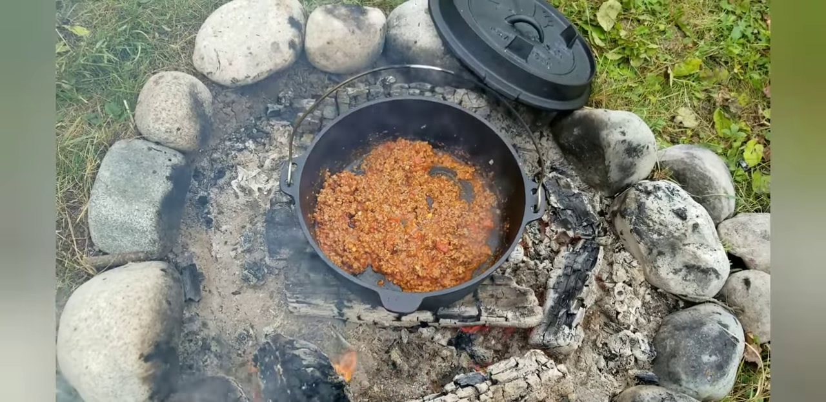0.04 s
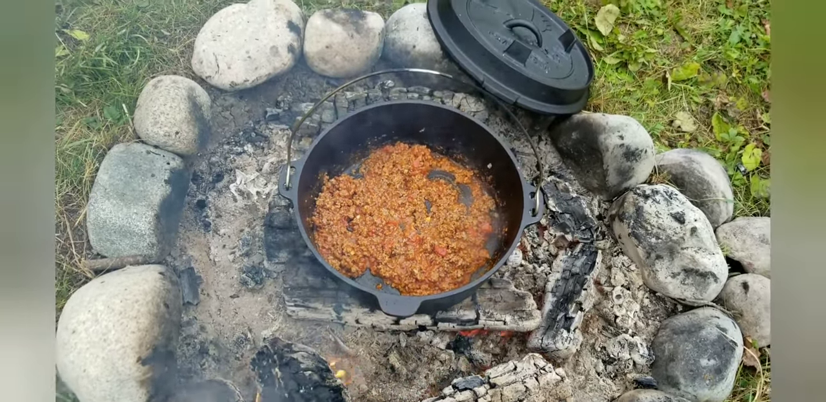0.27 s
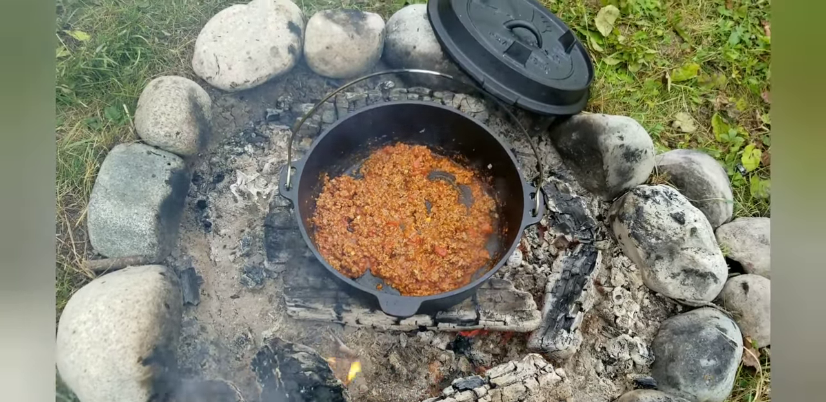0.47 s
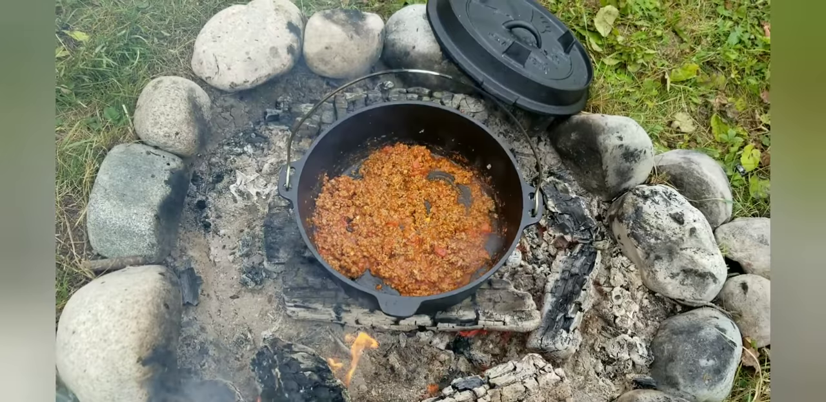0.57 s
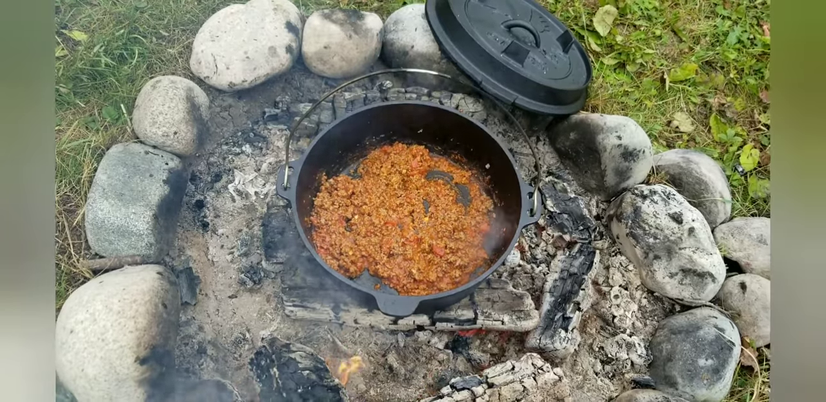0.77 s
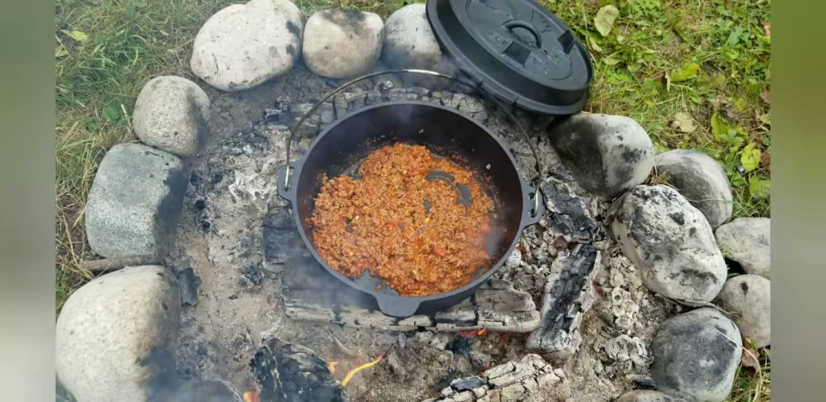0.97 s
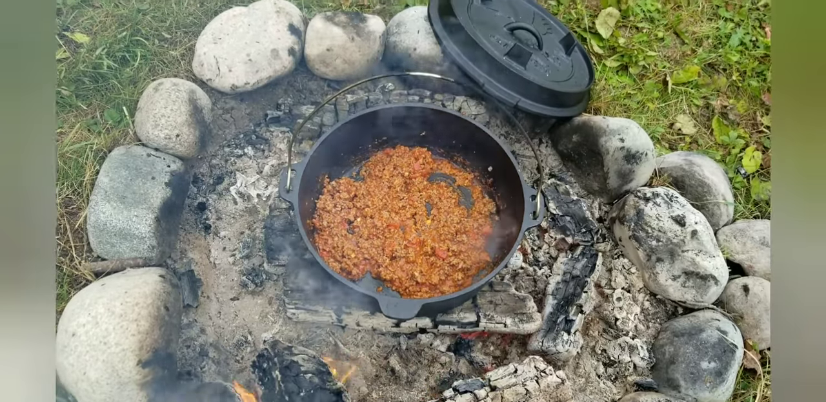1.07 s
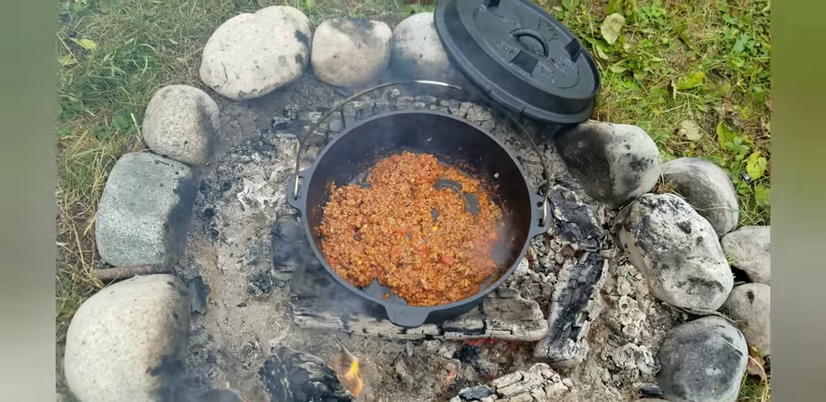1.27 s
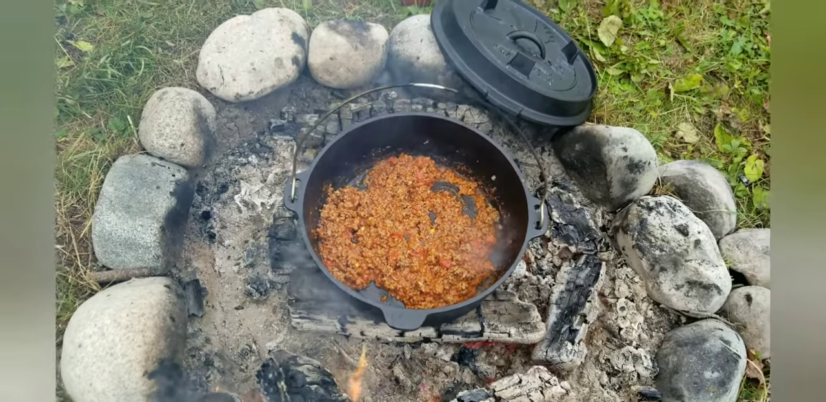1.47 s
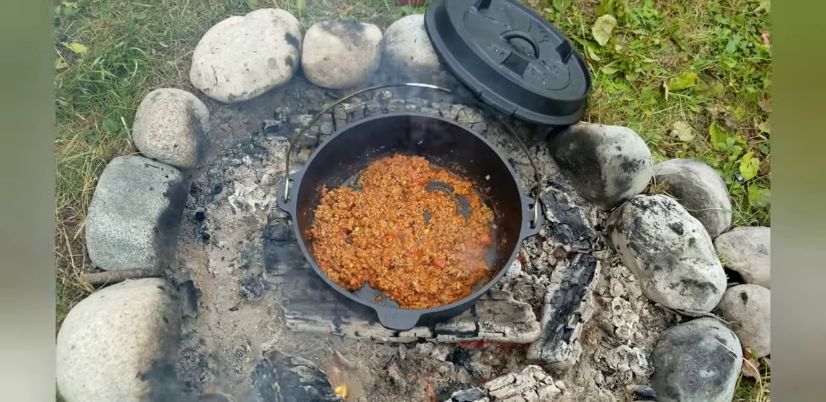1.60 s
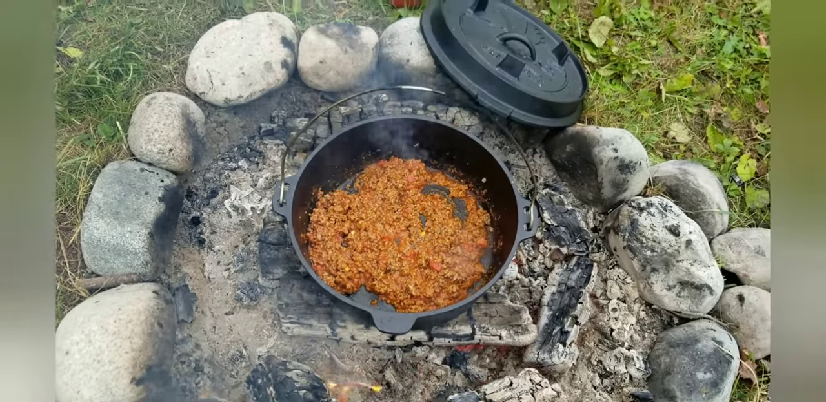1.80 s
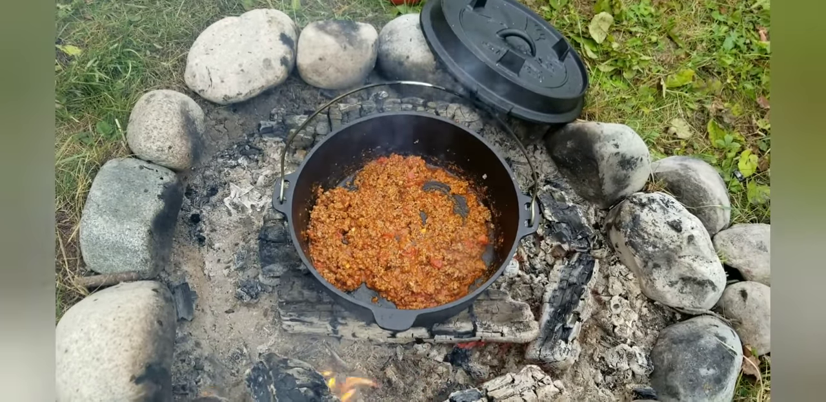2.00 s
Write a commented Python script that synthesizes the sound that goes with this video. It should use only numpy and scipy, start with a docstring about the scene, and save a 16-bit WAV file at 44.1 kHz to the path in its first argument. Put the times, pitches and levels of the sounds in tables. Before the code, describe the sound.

Meat sauce sizzling and simmering in an iron pot over a wood fire, two sharp pops

```python
"""Meat sauce simmers in a cast iron pot over an outdoor wood fire: dense random clicks over a noise wash.
Larger bubbles add short, slightly rising notes; steam is filtered noise, mostly right, that swells and sinks.
Flames are low noise with short flares; embers tick and crackle in short decaying bursts.
Twice the wood pops: a crack, spitting gas, ringing log modes and a low knock."""
import sys
import numpy as np
from scipy import signal
from scipy.fft import rfft, irfft
from scipy.io import wavfile
from scipy.ndimage import uniform_filter1d

SR = 44100
rng = np.random.default_rng(int(sys.argv[2]) if len(sys.argv) > 2 else 0)


def inscribe(sig):
    """Save sig as 16-bit PCM at rate SR to the path in sys.argv[1].

    A 1-D sig is mono; a 2-D sig holds one channel per row.
    Samples are clipped to [-1, 1] before scaling.
    """
    pcm = np.round(np.clip(np.atleast_2d(sig).T, -1, 1) * 32767)
    wavfile.write(sys.argv[1], SR, pcm.astype(np.int16))


N = 90404
TIME_S, FREQ_HZ = np.arange(N) / SR, np.fft.rfftfreq(N, 1 / SR)

# Ember crackle spectrum: f/Hz, density/dB per Hz
CRACKLE_SPECTRUM = [(500, -5), (3000, -5.5), (8000, -7), (15000, -2)]
CRACKLES_PER_S, CRACKLE_DB, CRACKLE_SPREAD_DB, CRACKLE_DECAY_S = 22, -55, 2.5, .0004

# Ember ticks: t/s, level/dB, decay/s, spectrum/dB at 600 Hz, 3 kHz, 7 kHz, 14 kHz,
# left-right/dB, right lag/s
TICKS = [(0.2276, -39.5, 0.0024, -30, 5.5, -6.5, -9, 1, .0004),
         (0.3224, -35, 0.0004, 9, -7, 6.5, -0.5, 5, .0004),
         (0.5315, -43, 0.0016, -2, 1, -6, -12, -1, .0004), (0.6384, -35, 0.00063, -31, -32, -21, 9, -1, 0),
         (0.7099, -33.5, 0.0013, -8, 1.5, -9.5, -7.5, -0.5, 0),
         (1.0940, -47, 0.00046, -6, -21, -9, 11, 6, 0), (1.3750, -41, .001, -3, 3, -3, 1, -2, 0),
         (1.4012, -46, .0006, 2, -17, -13, 5, 7, 0), (1.4623, -47, 0.0035, -16, 5, 5, -7, 7, 0),
         (1.9957, -43.5, 0.001, 5.5, -6.5, -39, -27, 2.5, 0)]
TICK_RISE_S, TICK_TAIL_DB, TICK_TAIL_S = 0.00032, -18, .004
TICK_LIKENESS = 0.23  # left-right, also for crackle
BURST_REF_S = .005  # burst levels: energy spread over this time

# Flame rumble spectrum: f/Hz, density/dB per Hz
FLAME_SPECTRUM = [(15, -34), (30, -27), (60, -3), (110, -12.5), (170, -21), (280, -27), (500, -35.5),
                  (1200, -39)]
# Steady flutter: t/s, level/dB
FLUTTER = [(0, -63), (.2, -58.5), (.65, -58.5), (.84, -62), (.92, -64.5), (1.05, -60), (1.2, -61),
           (1.3, -64), (1.5, -60.5), (1.66, -72), (1.8, -61), (2.05, -56.5)]
# Flares: start/s, length/s, level/dB, upper edge/Hz
FLARES = [(-.02, 0.059, -56, 118), (.05, .08, -57, 224), (.252, 0.029, -49.5, 158), (.275, 0.1, -53.5, 466),
          (.34, 0.11, -57, 143), (.465, 0.13, -55.5, 193), (.53, 0.11, -60.5, 232),
          (.755, 0.083, -51.5, 295), (.795, 0.086, -53, 138), (1.0, 0.05, -56.5, 167),
          (1.35, .1, -62.5, 137), (1.44, 0.14, -62, 104), (1.77, 0.087, -66, 105),
          (1.98, 0.045, -58.5, 138)]
FLARE_LOW_HZ, FLAME_LIKENESS = 42.4, 0.91

# Wood pops: t/s, crack level/dB, crack decay/s, gas level/dB, gas decay/s, tilt/dB per octave,
# left-right/dB, ring level/dB, knock level/dB, knock f/Hz
POPS = [(.461, -27.5, 0.0059, -29.5, 0.021, -2, 0, -48.5, -33.5, 353),
        (0.747, -21.5, 0.0028, -24.5, 0.014, 2, 3, -29, -34.5, 257)]
# Crack spectrum: f/Hz, density/dB per Hz
CRACK_SPECTRUM = [(80, -41), (200, -35), (380, -12.5), (700, -7), (950, -9), (1400, 1.5), (1700, -9.5),
                  (2050, 0), (2600, -7.5), (3200, -3.5), (4000, -4), (5000, -25), (8000, -20.5),
                  (11000, -24), (16000, -40)]
# Escaping gas spectrum: f/Hz, density/dB per Hz
GAS_SPECTRUM = [(80, -16.5), (250, -5.5), (450, -9), (680, -4.5), (900, -3), (1150, -3.5), (1600, -5.5),
                (2100, -11.5), (2500, -13), (2950, -5), (3500, -10.5), (6500, -17), (9000, -31),
                (16000, -37)]
# Log modes: f/Hz, relative level/dB, t60/s
LOG_MODES = [(637, -1, 0.1), (735, -11.5, .08), (1400, 3, 0.097), (2030, -7.5, 0.12), (2025, 6, 0.034),
             (2390, -3, 0.05), (2860, -1, 0.12), (3836, 1, 0.11), (4100, -38, 0.025)]
CRACK_RISE_S, GAS_RISE_S, GAS_HOLD_S = 0.0016, 0.0016, 0.022
POP_RIGHT_LAG_S, POP_LIKENESS = 0.000439, 0.72
GROUND_ECHO_S, GROUND_ECHO_GAIN = 0.00068, 0.15
KNOCK_RISE_S, KNOCK_DECAY_S, KNOCK_SAG = 0.001, 0.0061, 0.1  # sag: fraction of pitch

# Steam hiss spectrum: f/Hz, density/dB per Hz
HISS_SPECTRUM = [(400, -36), (900, -11.5), (1500, -4.5), (2000, -6.5), (2500, -1.5), (3600, -3),
                 (5600, 1.5), (7000, -3), (9300, -8), (12500, 1), (16000, -2)]
# Hiss gain on the left: f/Hz, gain/dB
HISS_LEFT = [(1000, -3.5), (2400, -5), (4200, -3), (5600, -12), (8500, 1), (14000, -7)]
# Steam course: t/s, level/dB, extra treble/dB
STEAM = [(0, -50.5, -3), (.15, -44, -3), (.27, -42, -9), (.34, -44.5, 4), (.43, -40, -1), (.56, -41, -2),
         (.68, -47, -6), (.78, -41, -21), (.87, -58, -14), (.97, -51, -8), (1.08, -47.5, 0),
         (1.27, -43, -3.5), (1.5, -43, -4), (1.78, -42, -1.5), (1.9, -44.5, -4.5), (2.05, -52.5, -8)]
HISS_FLICKER_DB, HISS_FLICKER_HZ, TREBLE_HZ = 1.0, 87, 8100
PATCH_DB = 1.7  # rms of the colour shifts

# Larger bubbles
BLIPS_PER_S, BLIP_DB, BLIP_SPREAD_DB = 160, -60, 2.5
BLIP_LOW_HZ, BLIP_HIGH_HZ = 557.6, 5120
BLIP_CYCLES, BLIP_GLIDE = 9.7, 0.035  # cycles per e-fold decay, fractional rise per e-fold

# Bubble spectrum, coloured by the pot: f/Hz, density/dB per Hz
SIMMER_SPECTRUM = [(250, -12.5), (420, -16.5), (560, 4.5), (660, 1), (830, -6.5), (1020, 3), (1250, -3),
                   (1480, 1.5), (1900, -7), (2800, -5), (4500, -5), (7000, -5.5), (9300, -11.5),
                   (12500, -3.5), (16000, -8.5)]
# Left-right likeness of the simmer: f/Hz, likeness
SIMMER_LIKENESS = [(500, 0.77), (1500, 0.85), (3000, 0.73), (6000, 0.083), (15000, 0.033)]
SIMMER_DB, BUBBLES_PER_S, WASH_SHARE = -53.5, 4000, 0.37  # share of power

EDGE_HZ = 16100


def amp(db):
    """Decibels to gain."""
    return 10 ** (np.asarray(db) / 20)


def evened(x):
    """Scales to an rms of one."""
    return x / np.sqrt(np.mean(x ** 2) + 1e-20)


def read(points, hz):
    """Reads a table on a log-frequency axis."""
    f, value = np.transpose(points)
    return np.interp(np.log(hz + 1), np.log(f + 1), value)


def add(mix, start_s, sound):
    """Mixes a stereo sound in at a time, trimmed to the mix."""
    at = round(start_s * SR)
    sound = sound[:, max(-at, 0):]
    part = mix[:, max(at, 0):][:, :sound.shape[1]]
    part += sound[:, :part.shape[1]]


def colour(x, points, tilt_db_per_octave=0, size=4096):
    """Minimum-phase filter that follows a spectrum, tilted about 2 kHz."""
    hz = np.fft.rfftfreq(size, 1 / SR)
    octaves = np.log2(np.maximum(hz, 200) / 2000)
    log_gain = np.log(amp(read(points, hz) + tilt_db_per_octave * octaves))
    circle = np.r_[log_gain, log_gain[-2:0:-1]]
    response = np.exp(np.conj(signal.hilbert(circle)))
    taps = np.fft.ifft(response).real[:size // 2]
    return signal.fftconvolve(x, taps[None], axes=1)[:, :x.shape[1]]


def pair(x, likeness):
    """Blends two unrelated signals into a left and a right of given likeness."""
    likeness = np.clip(likeness, -1, 1)
    mid = x[0] * np.sqrt((1 + likeness) / 2)
    side = x[1] * np.sqrt((1 - likeness) / 2)
    return np.array([mid + side, mid - side])


def place(x, pan_db, lag_s):
    """Sets the left-right balance and delays the right side."""
    size = x.shape[1]
    delay = np.exp(-2j * np.pi * np.fft.rfftfreq(size, 1 / SR) * lag_s)
    late = irfft(rfft(x[-1]) * delay, size)
    return np.array([x[0] * amp(pan_db / 2), late * amp(-pan_db / 2)])


def burst(envelope, points, db, likeness, tilt_db_per_octave=0):
    """A dense run of tiny fractures: random-sign impulses, shaped and coloured."""
    impulses = rng.choice([-1., 1.], (2, len(envelope)))
    x = colour(pair(impulses, likeness) * envelope, points, tilt_db_per_octave)
    return amp(db) * evened(x) * np.sqrt(BURST_REF_S * SR / len(envelope))


def patchy(x):
    """Lets narrow bands swell and sink by chance, so the colour keeps shifting."""
    z = signal.stft(x, nperseg=1024, noverlap=768)[2]
    patches = rng.standard_normal(z.shape[1:])
    for axis in (0, 1):
        patches = uniform_filter1d(patches, size=7, axis=axis)
    z = z * amp(PATCH_DB * evened(patches))
    return signal.istft(z, nperseg=1024, noverlap=768)[1][:, :N]


def crackle():
    """Faint snaps of the embers at random times: decaying bursts of fractures."""
    out, candidates = np.zeros((2, N)), 120
    envelope = np.exp(-TIME_S[:512] / CRACKLE_DECAY_S)
    for when, size, chance in rng.random((candidates, 3)):
        if chance < CRACKLES_PER_S * N / SR / candidates:
            db = CRACKLE_DB + CRACKLE_SPREAD_DB * min(-np.log(1 - size), 3)
            add(out, when * N / SR, burst(envelope, CRACKLE_SPECTRUM, db, TICK_LIKENESS))
    return out


def ticks():
    """Small snaps in the embers, each with a brief scatter off the stones."""
    out, t = np.zeros((2, N)), TIME_S[:4096]
    rise = np.minimum(t / TICK_RISE_S, 1)
    scatter = amp(TICK_TAIL_DB) * np.exp(-t / TICK_TAIL_S)
    for start_s, db, decay_s, low_db, mid_db, high_db, top_db, pan_db, lag_s in TICKS:
        envelope = rise * (np.exp(-t / decay_s) + scatter)
        points = [(120, low_db - 17), (600, low_db), (3000, mid_db), (7000, high_db), (14000, top_db)]
        add(out, start_s, place(burst(envelope, points, db, TICK_LIKENESS), pan_db, lag_s))
    return out


def flames():
    """Low noise flutter that rises and falls, with short band-passed flares."""
    rumble = colour(pair(rng.standard_normal((2, N)), FLAME_LIKENESS), FLAME_SPECTRUM)
    out = amp(np.interp(TIME_S, *np.transpose(FLUTTER))) * evened(rumble)
    low_cut = 1 + (FLARE_LOW_HZ / (FREQ_HZ + 1)) ** 4
    for start_s, length_s, db, edge_hz in FLARES:
        band = 1 / np.sqrt((1 + (FREQ_HZ / edge_hz) ** 5) * low_cut)
        roar = irfft(rfft(pair(rng.standard_normal((2, N)), FLAME_LIKENESS)) * band, N)
        swell = signal.windows.tukey(int(length_s * SR), .7)
        add(out, start_s, amp(db) * evened(roar[:, :len(swell)] * swell))
    return out


def log_body(t, ring_db, knock_db, knock_hz):
    """The log's modes ring briefly over a low knock that sags in pitch."""
    ring = 0
    for hz, db, t60_s in LOG_MODES:
        ring = ring + amp(db - 60 * t / t60_s) * np.sin(2 * np.pi * (hz * t + rng.random()))
    decay = np.exp(-t / KNOCK_DECAY_S)
    turns = np.cumsum(knock_hz * (1 - KNOCK_SAG * (1 - decay))) / SR
    knock = decay * np.sin(2 * np.pi * turns)
    rise = np.minimum(t / KNOCK_RISE_S, 1)
    return (rise * (amp(ring_db) * ring + amp(knock_db) * knock))[None]


def pops():
    """A pocket in the wood cracks open and spits gas; the ground echoes the crack."""
    out, t = np.zeros((2, N)), TIME_S[:8192]
    for (start_s, crack_db, crack_s, gas_db, gas_s, tilt,
         pan_db, ring_db, knock_db, knock_hz) in POPS:
        snap = np.minimum(t / CRACK_RISE_S, 1) ** 2 * np.exp(-t / crack_s)
        spit = np.minimum(t / GAS_RISE_S, 1) * np.exp(-np.maximum(t - GAS_HOLD_S, 0) / gas_s)
        crack = burst(snap, CRACK_SPECTRUM, crack_db, POP_LIKENESS, tilt)
        gas = burst(spit, GAS_SPECTRUM, gas_db, POP_LIKENESS, tilt)
        body = log_body(t, ring_db, knock_db, knock_hz)
        add(out, start_s, place(crack + gas + body, pan_db, POP_RIGHT_LAG_S))
        echo = GROUND_ECHO_GAIN * crack
        add(out, start_s + GROUND_ECHO_S, place(echo, pan_db, POP_RIGHT_LAG_S))
    return out


def steam():
    """Sputtering hiss, mostly right: coloured noise with moving level and treble."""
    t, level_db, treble_db = np.transpose(STEAM)
    noise = evened(patchy(colour(rng.standard_normal((2, N)), HISS_SPECTRUM)))
    left, right = rfft(noise)
    z = np.array([left * amp(read(HISS_LEFT, FREQ_HZ)), right])
    top = 1 / (1 + (TREBLE_HZ / (FREQ_HZ + 1)) ** 6)
    treble = irfft(z * top, N) * amp(np.interp(TIME_S, t, treble_db))
    hiss = irfft(z * (1 - top), N) + treble
    slow = rfft(rng.standard_normal(N)) / (1 + (FREQ_HZ / HISS_FLICKER_HZ) ** 2)
    flicker = evened(irfft(slow, N))
    return hiss * amp(np.interp(TIME_S, t, level_db) + HISS_FLICKER_DB * flicker)


def blips():
    """Larger bubbles burst with a short decaying note that rises a little."""
    out, candidates = np.zeros((2, N)), 800
    for when, pitch, size, side, chance in rng.random((candidates, 5)):
        if chance < BLIPS_PER_S * N / SR / candidates:
            hz = BLIP_LOW_HZ * (BLIP_HIGH_HZ / BLIP_LOW_HZ) ** pitch
            age = TIME_S[:2048] * hz / BLIP_CYCLES  # in e-fold decays
            turns = BLIP_CYCLES * age * (1 + BLIP_GLIDE * age / 2)
            note = np.exp(-age) * np.sin(2 * np.pi * turns)
            db = BLIP_DB + BLIP_SPREAD_DB * min(-np.log(1 - size), 3)
            add(out, when * N / SR, amp(db) * np.sqrt([[side], [1 - side]]) * note)
    return out


def simmer():
    """Thousands of tiny bubbles burst as random clicks over a fine noise wash."""
    bursting = rng.random((2, N)) < BUBBLES_PER_S / SR
    clicks = rng.choice([-1., 1.], (2, N)) * bursting
    wash = rng.standard_normal((2, N))
    drive = np.sqrt(1 - WASH_SHARE) * evened(clicks) + np.sqrt(WASH_SHARE) * wash
    stereo = irfft(pair(rfft(drive), read(SIMMER_LIKENESS, FREQ_HZ)), N)
    return amp(SIMMER_DB) * evened(colour(stereo, SIMMER_SPECTRUM))


def scene():
    """The fire and the pot above it."""
    fire = crackle() + ticks() + flames() + pops()
    pot = steam() + blips() + simmer()
    return fire + pot


def record(dry):
    """Band limit: linear-phase low-pass at EDGE_HZ."""
    taps = signal.firwin(511, EDGE_HZ, window=("kaiser", 9), fs=SR)
    return signal.oaconvolve(dry, taps[None], "same")


dry = scene()
out = record(dry)
inscribe(out)
```